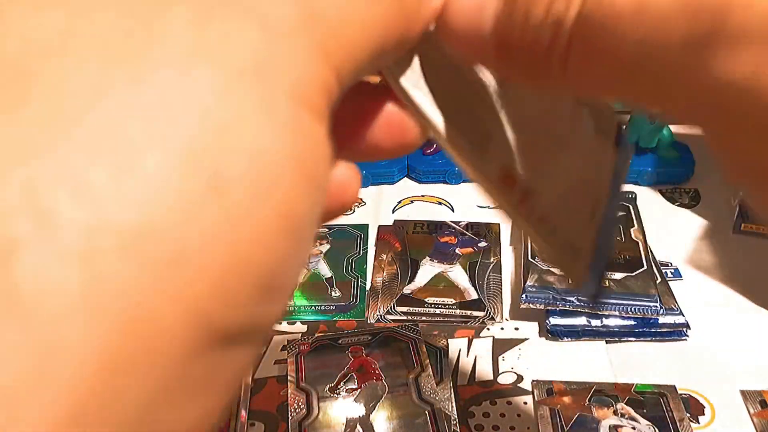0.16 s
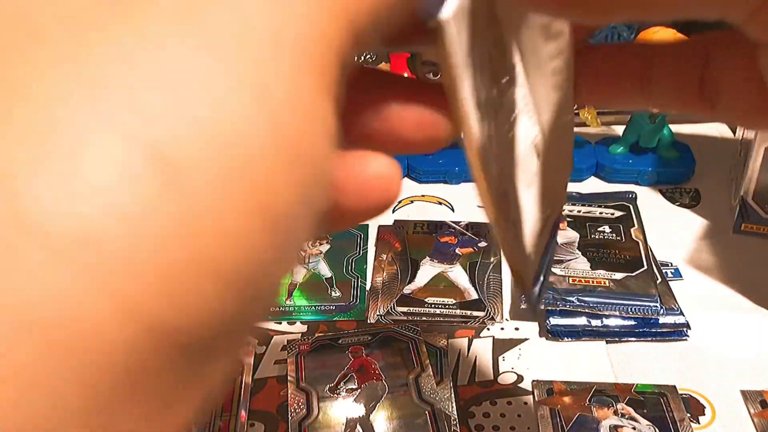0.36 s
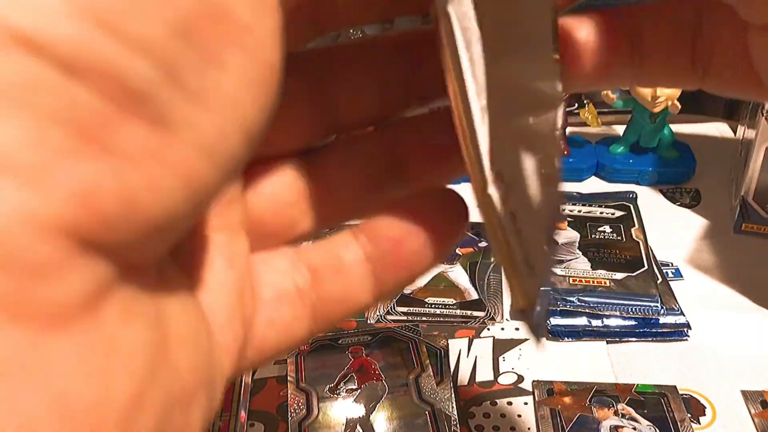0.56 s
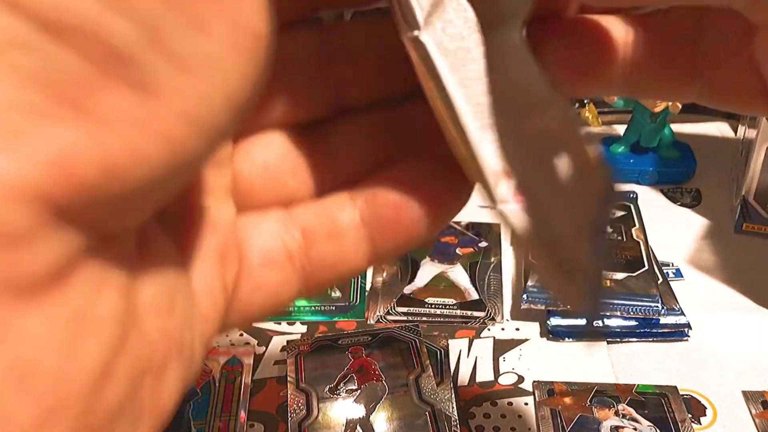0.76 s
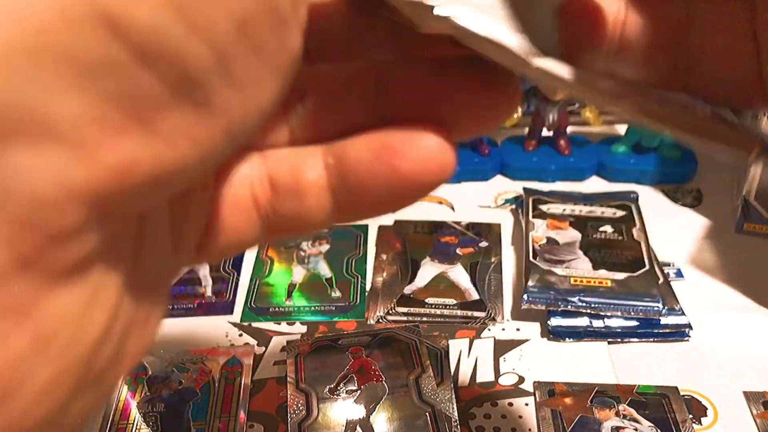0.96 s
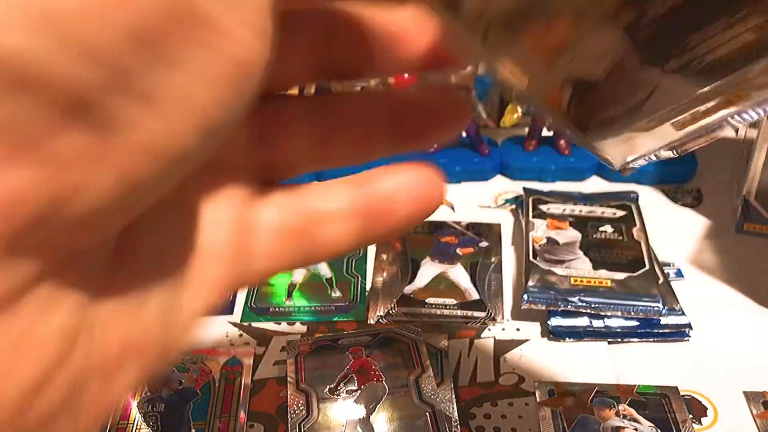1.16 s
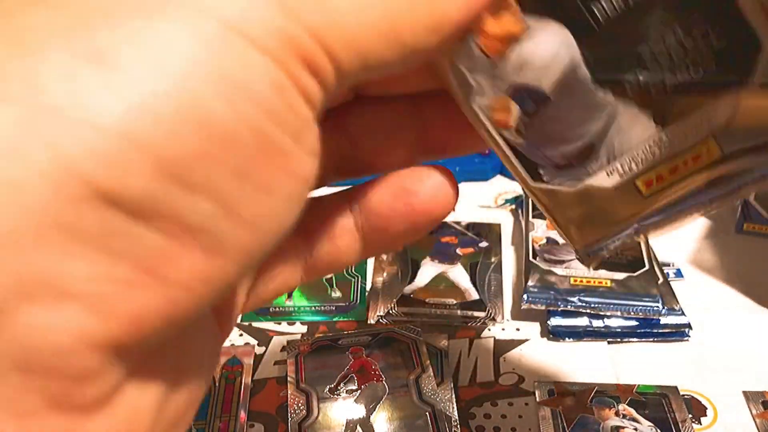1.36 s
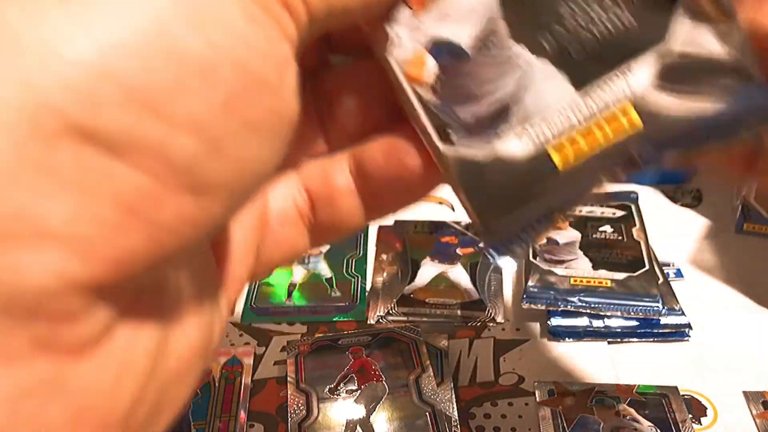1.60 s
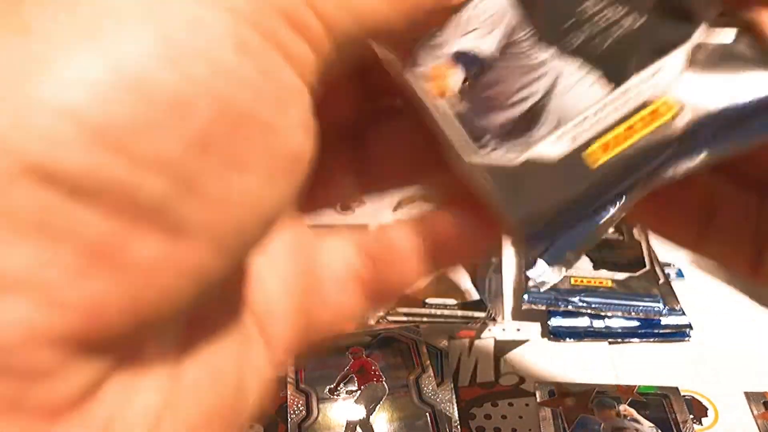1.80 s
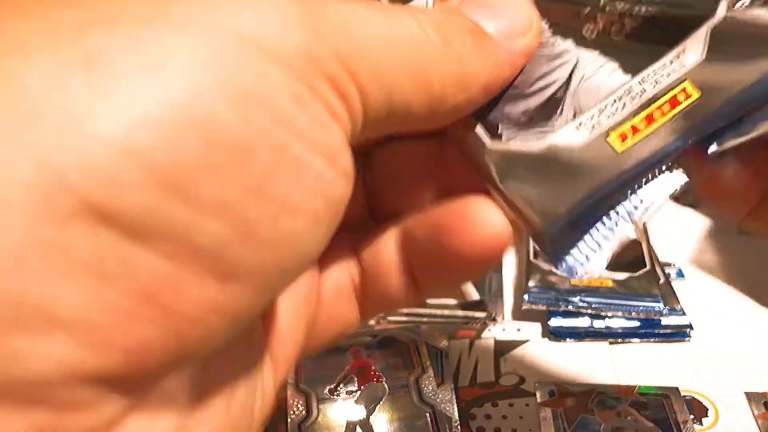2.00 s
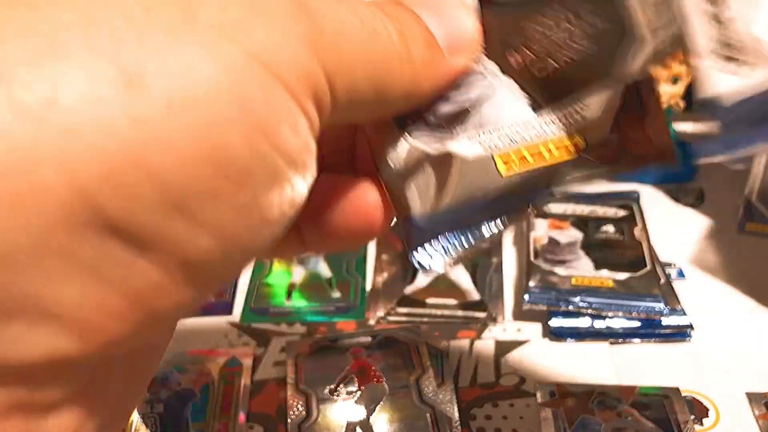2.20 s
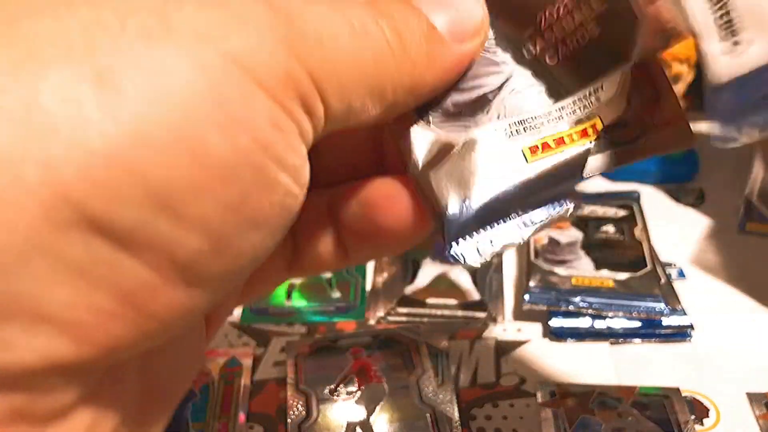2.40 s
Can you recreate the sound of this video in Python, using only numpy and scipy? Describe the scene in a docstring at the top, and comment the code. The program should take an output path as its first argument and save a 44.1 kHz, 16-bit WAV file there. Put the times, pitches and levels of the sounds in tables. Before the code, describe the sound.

A foil card packet is crinkled by hand, close and dry in a quiet room. Bright snaps cluster around 0.25 s; a very short buzzing seam peel comes at 0.65 s, with crackle until 0.85 s. After a sparser moment, a sharp snap at 1.13 s leads to busy crinkling and soft finger bumps near 1.3-1.5 s. The densest crackle bursts around 2 s, then thins into light ticks and dull handling rumble until 2.4 s.

```python
"""Hands crumple and pull open a foil card wrapper close to a microphone in a quiet room.
From the start, foil creases snap as noise bursts with a ringing pitch, over a crackle of tiny grains and rustle;
soft finger bumps (short low swings) join in. At about 0.6 s the seam peels in a short buzz of resonant slips.
Snapping and crackling go on, densest near 2 s; a dull rumble of filtered noise is stronger against the crackle
in the late handling, with a dip near 2 s. Steady coloured noise is the air of the room throughout."""
import sys
import numpy as np
from scipy import signal
from scipy.io import wavfile
from scipy.ndimage import uniform_filter1d

SR = 44100
rng = np.random.default_rng(int(sys.argv[2]) if len(sys.argv) > 2 else 0)


def wav_out(sig):
    """Save sig, one row per channel (or a flat mono array), as 16-bit PCM at SR to the path in sys.argv[1]."""
    wavfile.write(sys.argv[1], SR, np.round(np.clip(np.atleast_2d(sig).T, -1, 1) * 32767).astype(np.int16))


N = 108045  # length in samples

# Loudness course of the fine crackle under the fingers. Each row: time in seconds, level in dB.
CRACKLE_LEVEL = [(0, -58.5), (.015, -58), (.05, -68.5), (.09, -59), (.11, -41.5), (.135, -37), (.16, -55.5),
                 (.228, -53), (.234, -33), (.277, -27.5), (.282, -41.5), (.32, -43.5), (.35, -57.5),
                 (.38, -52.5), (.42, -38), (.435, -56), (.46, -40), (.48, -51.5), (.53, -53.5), (.6, -59),
                 (.612, -46), (.64, -36), (.66, -41), (.683, -61), (.69, -30.5), (.77, -29.5), (.785, -35),
                 (.81, -24), (.83, -32.5), (.855, -33.5), (.885, -53.5), (.925, -68), (.95, -52),
                 (.985, -48.5), (1.05, -40.5), (1.075, -51.5), (1.125, -54), (1.135, -40.5), (1.16, -55),
                 (1.25, -58.5), (1.27, -44.5), (1.292, -50.5), (1.31, -30.5), (1.35, -29.5), (1.391, -21),
                 (1.397, -39), (1.42, -48.5), (1.455, -63), (1.48, -39), (1.5, -36.5), (1.52, -49.5),
                 (1.565, -47.5), (1.61, -54), (1.64, -41), (1.66, -50.5), (1.685, -39), (1.715, -56),
                 (1.755, -40.5), (1.775, -56), (1.805, -55.5), (1.825, -38), (1.86, -53), (1.945, -33.5),
                 (1.97, -41.5), (2.01, -31), (2.04, -26.5), (2.06, -40.5), (2.1, -51), (2.16, -41),
                 (2.2, -43), (2.25, -64.5), (2.28, -42), (2.345, -57.5), (2.365, -40), (2.39, -57.5),
                 (2.43, -62)]
# Colour of the foil. Each row: frequency in Hz, relative level in dB per Hz.
FOIL_COLOUR = [(710, -31.5), (1200, -7.5), (1540, -8.5), (2650, -3.5), (2860, -3.5), (4550, 1),
               (4960, -0.5), (9210, -1.5), (10500, -6), (12500, -2.5), (15000, -6.5), (16000, -5.5)]
# Bass colour of the wrapper. Each row: frequency in Hz, relative level in dB per Hz.
WRAPPER_BASS = [(150, -10.5), (350, -2.5), (700, 0.5), (1200, 0), (1800, 2.5), (3000, -14)]

PEAK_AT = 0.45  # time constant of a burst's swell, as a share of its nominal length
BASS_LENGTH = 0.94  # length of a bass burst, as a share of the snap or grain length


def gain_of(db):
    """Amplitude factor for a level in dB."""
    return 10 ** (np.asarray(db) / 20)


def evened(x):
    """Scale to an RMS of 1."""
    return x / np.sqrt(np.mean(x ** 2, axis=-1, keepdims=True) + 1e-20)


def add(mix, s, sound):
    """Lay a sound into the mix from second s on, cut off at the end."""
    part = mix[round(s * SR):][:len(sound)]
    part += sound[:len(part)]


def curve(rows, column):
    """Straight lines through one column of a table, its first column being time in seconds."""
    rows = np.array(rows)
    return np.interp(np.arange(N) / SR, rows[:, 0], rows[:, column])


def coloured(x, points):
    """Causal minimum-phase filter with the given spectrum; white noise keeps its level."""
    f, db = np.transpose(points)
    bins = abs(np.fft.fftfreq(8192, 1 / SR))
    log_gain = np.log(gain_of(np.interp(np.log(bins + 1), np.log(f + 1), db)))
    spectrum = np.exp(np.conj(signal.hilbert(log_gain)))
    taps = np.fft.ifft(spectrum).real[:4096]
    return signal.oaconvolve(x, taps / np.linalg.norm(taps))[:len(x)]


def ring(x, hz, width):
    """One two-pole resonance, width in Hz; white noise keeps its level."""
    r = np.exp(-np.pi * abs(width) / SR)
    poles = [1, -2 * r * np.cos(2 * np.pi * hz / SR), r * r]
    return signal.lfilter([1, 0, -1], poles, x) * np.sqrt((1 - r * r) / 2)


def burst(ms, noise):
    """Noise that swells and dies in a time set by its nominal length and leaves a faint tail; energy 1."""
    tail_t60, tail_db = 0.025, -13.5  # seconds; dB against the peak of the swell
    t = np.arange(len(noise)) / SR
    u = t / (PEAK_AT * ms / 1000)
    swell = u * np.exp(1 - u)
    tail = np.minimum(u, 1) * gain_of(tail_db - 60 * t / tail_t60)
    out = noise * (swell + tail)
    return out / np.linalg.norm(out)


def room_tone():
    """The quiet air of the room: steady noise, heaviest in the deep bass."""
    # Each row: frequency in Hz, relative level in dB per Hz.
    air_colour = [(18, 15), (30, 19), (112, 0), (336, -13), (1590, -46), (2410, -40), (6380, -32),
                  (16000, -39)]
    level_db = -61
    return gain_of(level_db) * evened(coloured(rng.standard_normal(N), air_colour))


def rumble():
    """Dull noise of skin on the pack, stronger against the crackle in the late handling, with a dip near 2 s."""
    # Each row: time in seconds, level in dB added to the share of the crackle's level it follows.
    rumble_level = [(0, -31), (1.2, -46), (1.3, -30), (1.6, -18.5), (2.0, -30), (2.15, -18), (2.45, -20.5)]
    follows = 0.76  # share of the crackle's dB course
    noise = evened(ring(rng.standard_normal(N), 123, 250))
    crackle_db = uniform_filter1d(curve(CRACKLE_LEVEL, 1), size=500)
    return noise * gain_of(curve(rumble_level, 1) + follows * crackle_db)


def bumps():
    """Soft finger bumps: low, dull pushes of a cycle or two under a bell-shaped swell."""
    # Each row: time of the middle in seconds, peak of the swell in dB, pitch in Hz.
    finger_bumps = [(.12, -46, 200), (0.468, -48, 148), (1.199, -48.5, 232), (0.517, -47.5, 262),
                    (.82, -51.5, 60), (1.047, -44.5, 237), (1.135, -42.5, 213), (1.274, -38.5, 137),
                    (1.386, -36.5, 103), (1.381, -32, 235), (1.406, -45, 50), (1.473, -35, 280),
                    (1.509, -35.5, 203), (1.538, -50, 280), (1.652, -45.5, 76), (1.842, -44.5, 69),
                    (1.95, -49, 100), (1.991, -40, 109), (2.045, -39, 98), (2.22, -45.5, 52.3),
                    (2.3, -39.5, 125), (2.38, -45, 62.5)]
    width_turns = 1.58  # width of the swell in cycles, between its 1/e points
    out = np.zeros(N)
    for (s, db, hz), phase in zip(finger_bumps, rng.random(len(finger_bumps))):
        turns = np.arange(-.04, .04, 1 / SR) * hz
        swell = np.exp(-(2 * turns / width_turns) ** 2)
        add(out, s - .04, gain_of(db) * swell * np.sin(2 * np.pi * (turns + phase)))
    return out


def peel():
    """Stick and slip: nearly regular slips of the glue line click into the taut seam's resonances."""
    # Each row: time in seconds, slips per second, level in dB before the seam's resonances.
    peel_course = [(.607, 500, -70), (.609, 520, -42), (.626, 600, -38), (.628, 250, -70),
                   (.6326, 250, -70), (.6332, 250, -30), (.642, 290, -28), (.648, 440, -26),
                   (.658, 640, -24.5), (.666, 600, -26), (.671, 500, -28), (.684, 540, -31),
                   (.686, 500, -70)]
    # Resonances of the taut seam. Each row: pitch in Hz, width in Hz, relative level in dB.
    seam_rings = [(3430, 870, -1.5), (4530, 380, -2.5), (6760, 1100, -4), (8850, 1200, 1), (12300, 1300, 0),
                  (14900, 530, -5)]
    jitter_turns, spread_db, colour_db = .04, 1.3, 2.5  # unevenness of slip timing, level and colour
    rate = curve(peel_course, 1)
    wander = evened(uniform_filter1d(rng.standard_normal(N), size=60))
    turns = np.cumsum(rate) / SR + jitter_turns * wander
    # one click at each new whole turn, scaled so that the rate leaves the loudness alone
    slips = np.diff(np.floor(np.maximum.accumulate(turns)), prepend=0) * np.sqrt(SR / rate)
    slips *= gain_of(curve(peel_course, 2) + spread_db * rng.standard_normal(N))
    out = np.zeros(N)
    for k, (hz, width, db) in enumerate(seam_rings):
        clicks = slips * gain_of(colour_db * rng.standard_normal(N))
        out += (-1) ** k * gain_of(db) * ring(clicks, hz, width)  # alternate polarity
    return out / 2


def steady(x):
    """Flatten the slow loudness swings, leaving the crackle's grain."""
    return x / np.sqrt(uniform_filter1d(x ** 2, size=1500) + 1e-9)


def crackle():
    """Tiny creases of clumped loudness; each of 40 patches has its own burst and pitch."""
    # Bass against the crackle's level. Each row: time in seconds, share in dB.
    bass_share = [(.13, -9), (.24, -22), (.5, -4.5), (.62, -17), (.75, -27), (.9, -4.5), (1.3, -6.5),
                  (1.65, -2.5), (1.85, -18.5), (2.0, -3.5), (2.4, -4.5)]
    grains_per_s, spread_db, clump_db = 2200, 4.6, 2.3
    shortest_ms, longest_ms = .08, .5  # nominal grain lengths
    rustle_db = -8  # smooth rustle of sliding film, against the grains
    patches = 40

    smooth = uniform_filter1d(uniform_filter1d(rng.standard_normal(N), size=120), size=120)
    clumps = evened(smooth)
    size = gain_of(spread_db * np.minimum(rng.exponential(1, N), 4) + clump_db * clumps)
    size *= (rng.random(N) < grains_per_s / SR) * rng.choice([-1, 1], N)
    patch, fine, deep = rng.integers(0, patches, N), np.zeros(N), np.zeros(N)
    for k, hz in enumerate(rng.permutation(np.geomspace(1300, 14500, patches))):
        fine_noise, deep_noise = rng.standard_normal((2, 500))
        ms = np.exp(rng.uniform(np.log(shortest_ms), np.log(longest_ms)))
        grain = burst(ms, fine_noise)
        hits = size * (patch == k)
        fine += signal.oaconvolve(hits, grain + ring(grain, hz, 700))[:N]
        deep += signal.oaconvolve(hits, burst(BASS_LENGTH * ms, deep_noise))[:N]

    fine_rustle, deep_rustle = gain_of(rustle_db) * rng.standard_normal((2, N))
    level = gain_of(curve(CRACKLE_LEVEL, 1))
    bass_level = level * gain_of(curve(bass_share, 1))
    foil = coloured(level * (steady(fine) + fine_rustle), FOIL_COLOUR)
    return foil + coloured(bass_level * (steady(deep) + deep_rustle), WRAPPER_BASS)


def chime(hz, ms, turn):
    """A patch of foil swings at its own pitch and dies away within milliseconds, later for longer snaps."""
    extra_ms = 1.37  # lets even the shortest snaps ring a little
    t = np.arange(1200) / SR
    u = t / (PEAK_AT * (ms + extra_ms) / 2000)
    return u * np.exp(-u) * np.sin(2 * np.pi * (hz * t + turn))


def snaps():
    """Each crease bursts across the foil and rings near its own pitch, with its own bass and treble."""
    # Loud creases. Each row: time in seconds, relative level in dB, nominal length in ms, ring pitch in Hz,
    # relative bass share in dB, treble against the band below 8 kHz in dB.
    crease_snaps = [(0.0111, -34, 0.49, 5570, -24, 4.5), (0.1335, -43.5, 1.1, 8700, -4.5, 10),
                    (0.1675, -38, 0.31, 11800, -15, 14.5), (0.2428, -25, 2.46, 3420, -27.5, 1.5),
                    (0.2542, -31, 1.2, 4400, -42, 3), (0.2625, -29.5, 1.5, 4640, -26, -10),
                    (0.2722, -31.5, 1.65, 3370, -14, -8), (0.3076, -24.5, 0.74, 3320, -39, -0.5),
                    (0.3335, -36.5, 2.4, 3340, -14, 2), (0.368, -38.5, 3, 4970, -20, 3),
                    (0.386, -36.5, 0.11, 11900, -28, 18.5), (0.3986, -33, 0.97, 6000, -17, 9),
                    (0.4215, -31, 1.2, 13000, -32, 7.5), (0.439, -40, 2.5, 1280, -7.5, 7),
                    (0.4461, -43, 2, 3670, -1, 17), (0.4622, -32.5, 0.53, 6070, -27, 6),
                    (0.467, -32, 2.3, 9000, -12.5, -9), (0.4902, -44, 0.85, 3770, -4, 2),
                    (0.5053, -31, 1.2, 6000, -27, 3), (0.5185, -32, 0.87, 3500, -5, -7),
                    (0.551, -46, 0.58, 5860, -16, -9), (0.578, -44.5, 1.2, 1530, -6.5, 7),
                    (0.6267, -38.5, 0.3, 4830, -28, -3), (0.638, -37.5, 1.2, 1400, -20, -10),
                    (0.276, -39, 1.7, 5950, -20, -5), (0.6672, -23, 1.22, 4730, -43, -18),
                    (0.6865, -25.5, 0.4, 4500, -21.5, 7.5), (0.701, -36, 0.48, 8600, -24, 10),
                    (0.7163, -44, 1.9, 6940, -29, 21), (0.7244, -33, 0.26, 3600, -9.5, 1),
                    (0.742, -30.5, 1.9, 4380, -34, 5), (0.756, -29.5, 2.6, 3670, -7, 2.5),
                    (0.772, -34, 3.7, 3470, -28, 1), (0.8023, -30.5, 1.9, 1560, -5, 3),
                    (0.8097, -35, 1.13, 4940, -4, 15), (1.1202, -40.5, 0.37, 1770, -9, -12),
                    (0.8365, -38.5, 1.9, 4500, -18, 13), (0.8553, -24.5, 1.04, 3740, -40, -8),
                    (1.0085, -40.5, 0.57, 8070, -35, 8), (1.0223, -39, 1.6, 6170, -18, 3),
                    (1.0441, -32.5, 1.17, 8900, -3, 4), (1.131, -20, 1.01, 5280, -23, -3.5),
                    (1.1349, -32, 0.78, 2500, -6, -3), (1.2181, -41, 2, 3140, -9, -27),
                    (1.2706, -39.5, 2.5, 1510, -2.5, -1), (1.3021, -27, 0.9, 1410, -11.5, 1.5),
                    (1.3144, -33, 1.9, 5400, -20, 2), (1.3367, -24.5, 1.4, 1590, -24, 9.5),
                    (1.3478, -26, 1.1, 5900, -27, 2), (1.3505, -31, 2.6, 7200, -24, 12.5),
                    (1.367, -26, 0.65, 5800, -19, -7), (1.3759, -23.5, 3.4, 5040, -4, 9),
                    (1.3852, -31, 1.63, 5000, -10, 11), (1.4148, -37.5, 1.1, 1940, -4, -25),
                    (1.4756, -33, 0.27, 5240, -12, 9), (1.489, -27, 0.4, 5540, -8.5, -3),
                    (1.4976, -36.5, 0.89, 3960, -30, 2), (1.5252, -34.5, 0.96, 12900, -16, -1),
                    (1.533, -38.5, 1.5, 4630, -5, 10), (1.6214, -42, 0.33, 8700, -11, -14),
                    (1.6826, -28, 1.77, 5600, -30, -14), (1.7032, -36, 0.75, 3920, -23, -5),
                    (1.788, -33, 3.6, 3950, -11, -1), (1.8372, -27.5, 0.76, 4340, -9.5, 6),
                    (1.865, -35.5, 0.69, 4000, -8, -4), (1.8885, -27, 0.49, 4250, -36, 1.5),
                    (1.9016, -28, 0.24, 7060, -16, 2), (1.9224, -32.5, 1.9, 5840, -32, 8),
                    (1.9429, -25.5, 1.17, 4660, -10, 8.5), (1.9773, -22.5, 2, 5400, -11.5, 7.5),
                    (1.9948, -29, 0.25, 5000, -20, 12), (1.9989, -21, 1.84, 11900, -8, -10),
                    (1.981, -20.5, 1.7, 5380, -20, 1), (2.0091, -20.5, 1.93, 3900, -6.5, 1.5),
                    (2.0134, -26.5, 1.4, 6300, -4, 2), (2.0199, -37.5, 0.66, 2000, -10, 8),
                    (2.0245, -37, 0.87, 910, -2, -8), (2.029, -28, 0.33, 6950, -9, -5),
                    (2.044, -26.5, 1.5, 1400, -6, -9), (2.0701, -35.5, 1.9, 2150, -3, -12),
                    (2.134, -51, 0.55, 3000, -20, -15), (2.1515, -33, 1.45, 6450, -17, -8),
                    (2.029, -20.5, 0.91, 4550, -10, -22), (2.0377, -22, 2, 3950, -3, -4),
                    (2.0532, -36.5, 0.61, 12100, -19, 11.5), (2.0589, -32, 0.69, 2660, -18, 8),
                    (2.1169, -32.5, 0.067, 6300, -8, 5.5), (2.1427, -35.5, 1.7, 2540, -20, -5),
                    (2.1586, -33, 1.04, 2060, -10, -12), (2.1655, -37.5, 1.7, 3330, -1.5, 1),
                    (2.1732, -34.5, 0.57, 6550, -24, 4), (2.1795, -33, 1.1, 4500, -15, -1),
                    (2.1906, -31.5, 0.7, 6330, -16, -16), (2.278, -34.5, 0.65, 4180, -26, -18),
                    (2.306, -34, 2.3, 2380, -7.5, -24), (2.3234, -39, 0.87, 1480, -17, -21),
                    (2.3591, -37, 2.4, 1210, -6.5, -18), (2.375, -39, 0.16, 8400, -18, 1),
                    (2.4, -41, 0.71, 1790, -8, -16), (1.6728, -37, 0.88, 4100, -19, -10),
                    (2.263, -46, 0.6, 3750, -12, -5), (2.337, -45, 0.46, 5500, -12, -15),
                    (0.2373, -34, 2.5, 3520, -7.5, 2), (.873, -40.5, 1.1, 1690, -10, 3),
                    (1.4699, -38, 1.2, 2330, 1.5, -8), (1.696, -38, 0.73, 3680, -10, -17),
                    (1.8251, -41.5, 0.51, 1930, -10, -8), (1.965, -30.5, 2.9, 1850, -5, -5)]
    ring_db, wide_db, treble_length = -1.5, -1, .6  # treble_length: share of the snap's length
    spiky_db = 4  # a snap is a cluster of uneven ticks
    noise, spikes = rng.standard_normal((len(crease_snaps), 3, 1200, 2)).transpose(3, 0, 1, 2)
    noise = noise * gain_of(spiky_db * spikes)
    low = signal.butter(4, 8000, "low", fs=SR, output="sos")
    high = signal.butter(4, 8000, "high", fs=SR, output="sos")
    deep = signal.butter(2, 1500, fs=SR, output="sos")
    wide, ringing, bass = np.zeros((3, N))
    for row, noises, turn in zip(crease_snaps, noise, rng.random(len(crease_snaps))):
        s, db, ms, hz, bass_db, treble_db = row
        body_noise, treble_noise, bass_noise = noises
        body = evened(signal.sosfilt(low, burst(ms, body_noise)))
        treble = evened(signal.sosfilt(high, burst(treble_length * ms, treble_noise)))
        thump = evened(signal.sosfilt(deep, burst(BASS_LENGTH * ms, bass_noise)))
        start = s - PEAK_AT * ms / 2000  # the listed time falls halfway up the swell
        size = gain_of(db) / 3
        add(wide, start, size * (body + gain_of(treble_db) * treble))
        add(ringing, start, size * evened(chime(hz, ms, turn)))
        add(bass, start, size * gain_of(bass_db) * thump / 2)
    foil = gain_of(wide_db) * coloured(wide, FOIL_COLOUR)
    return foil + gain_of(ring_db) * ringing + coloured(bass, WRAPPER_BASS)


def room(x):
    """The direct sound, then a short diffuse tail of decaying noise."""
    t60, tail_db, delay_s = 0.03, -19.5, 0.0062  # tail_db: energy of the tail against the direct sound
    t = np.arange(6000) / SR
    tail = rng.standard_normal(len(t)) * gain_of(-60 * t / t60) * (t > delay_s)
    taps = gain_of(tail_db) * tail / np.linalg.norm(tail)
    taps[0] = 1
    return signal.oaconvolve(x, taps)[:N]


def scene():
    """The foil sounds in the room, with the bumps, rumble and air added dry; one channel."""
    air = room_tone()
    foil = room(snaps() + crackle() + peel())
    return (foil + bumps() + rumble() + air)[None]


def record(dry):
    """A low cut, soft overload on the hardest snaps, and a plain low-pass at 16 kHz."""
    ceiling, edge_hz = .62, 16000  # amplitude the overload levels off at; edge of the low-pass
    dry = signal.sosfilt(signal.butter(2, 45, "high", fs=SR, output="sos"), dry)
    dry = ceiling * np.tanh(dry / ceiling)
    low_pass = signal.firwin(255, edge_hz, window=("kaiser", 9), fs=SR)
    return signal.oaconvolve(dry, low_pass[None], "same")


dry = scene()
out = record(dry)
wav_out(out)
```